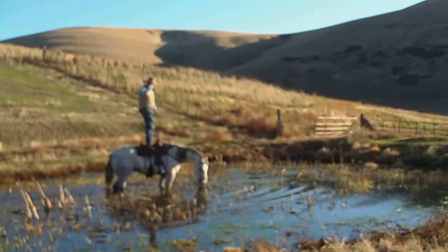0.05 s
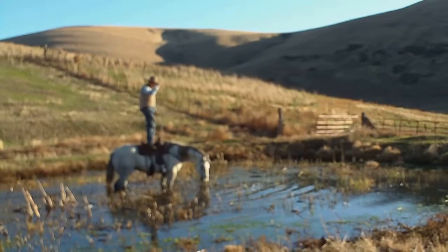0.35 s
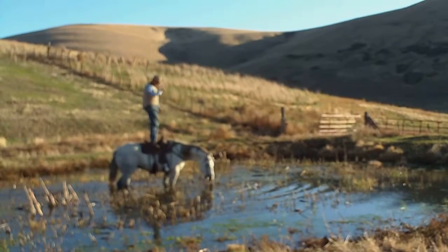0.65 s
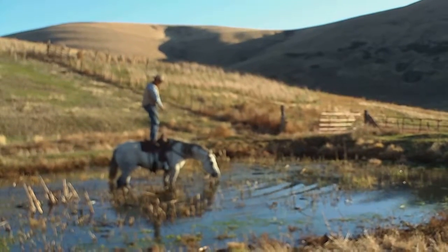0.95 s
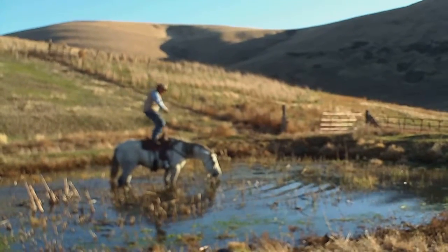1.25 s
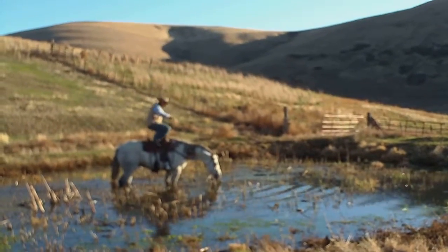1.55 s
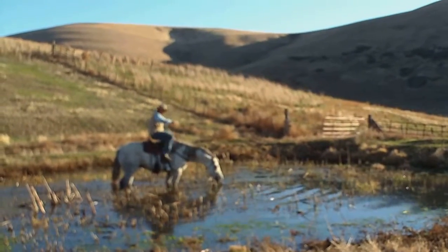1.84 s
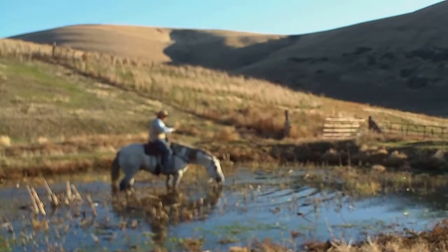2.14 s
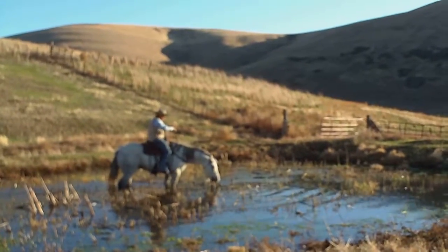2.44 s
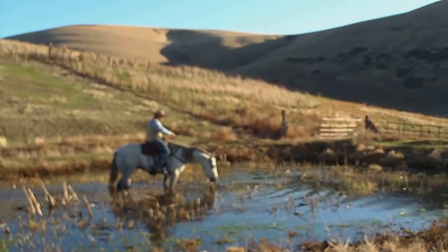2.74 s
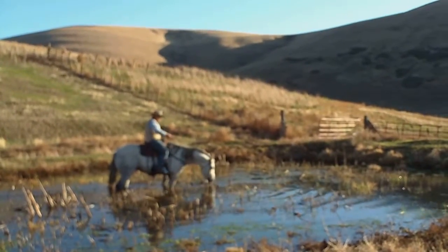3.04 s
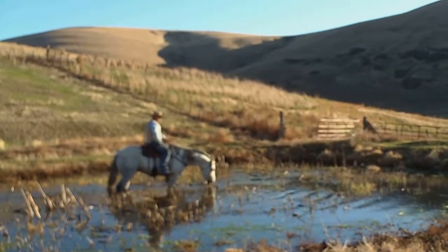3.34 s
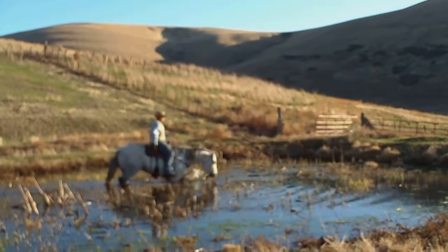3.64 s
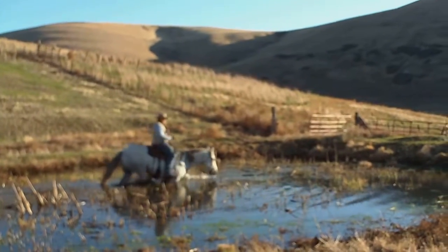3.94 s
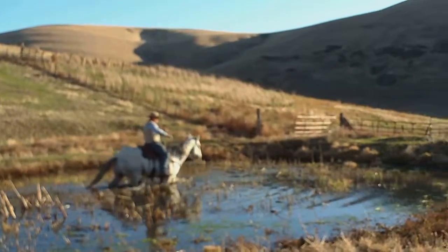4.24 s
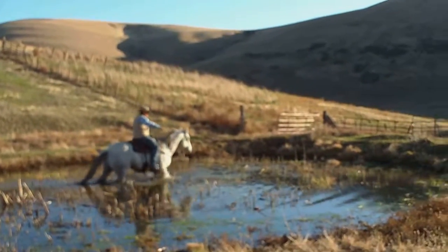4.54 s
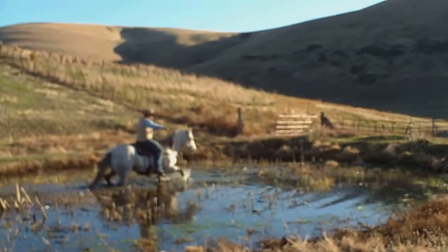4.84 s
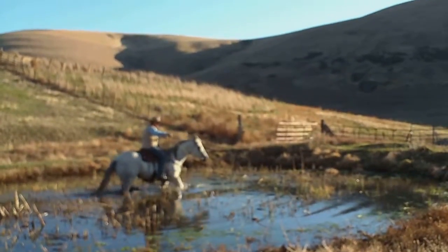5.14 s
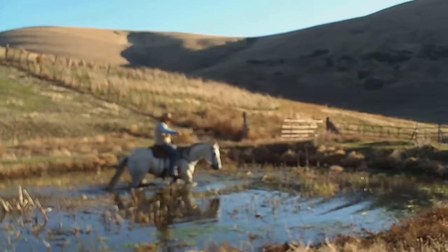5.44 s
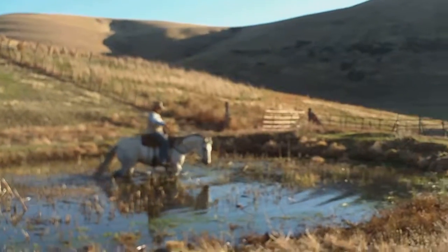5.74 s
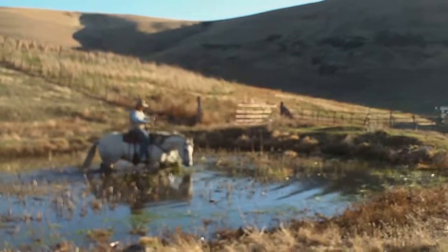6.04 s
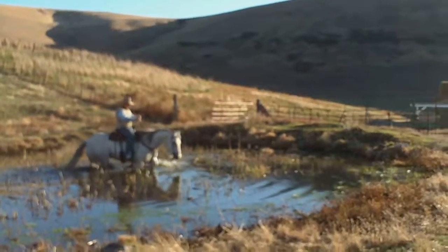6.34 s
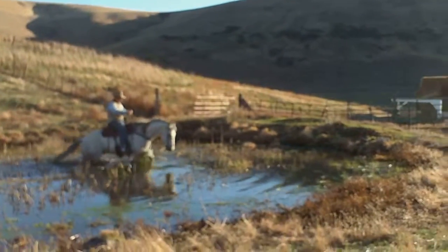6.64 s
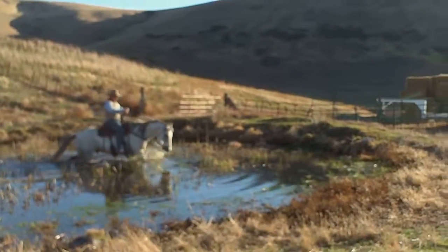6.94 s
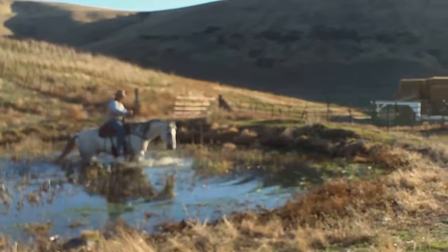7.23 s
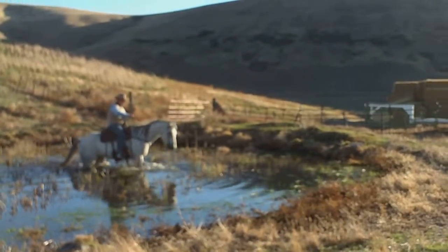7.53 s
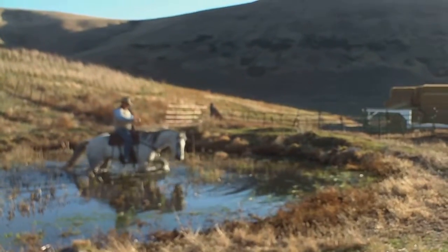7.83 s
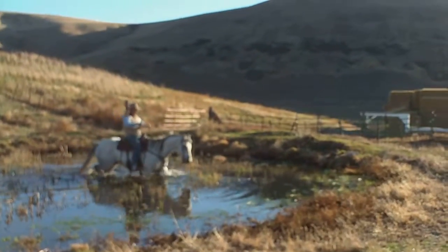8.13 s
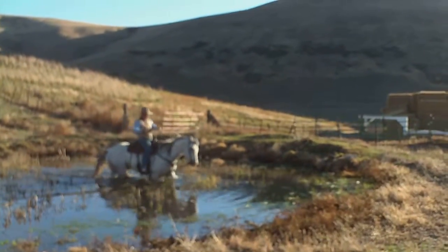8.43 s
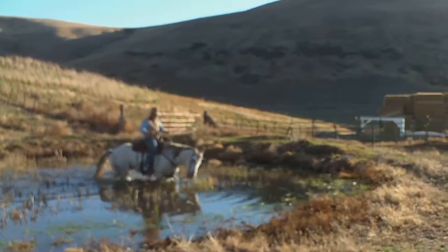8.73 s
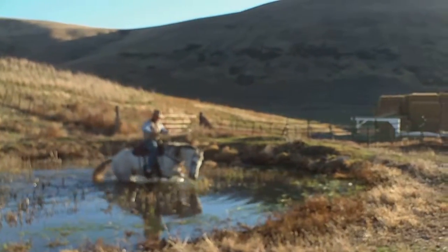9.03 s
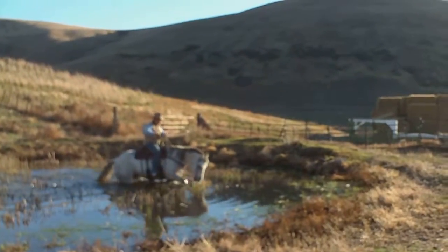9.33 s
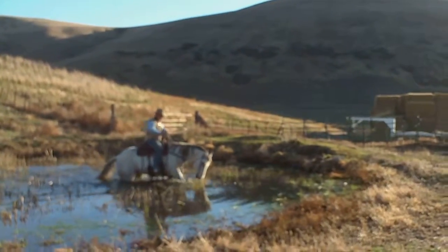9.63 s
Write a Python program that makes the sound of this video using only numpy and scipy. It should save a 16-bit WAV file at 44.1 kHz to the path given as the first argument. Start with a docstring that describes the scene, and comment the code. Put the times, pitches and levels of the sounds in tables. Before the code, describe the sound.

A steady hiss runs throughout this fairly quiet outdoor scene. For the first three seconds, gusts of wind rumble on the microphone with irregular low thumps, strongest between 1 and 2 seconds. A few faint drips fall into a pond in the first second, and another at about 3 seconds. Near 1.8 seconds saddle leather gives a very short squeak, jumping from low to high, and buckles click and clink just after 2 seconds.

At about 3.4 seconds a horse begins wading through the shallow water, with a cluster of sharp splashes around 3.8 to 4.1 seconds. Uneven strides follow roughly every half second, sloshing and bubbling, with hollow plops, low glugs and pattering spray. The splashing swells again from 6 to 7.3 seconds and from 8 to 8.6, then softens, with a last small splash near 9.7 seconds. The wind stays faint beneath the water.

```python
"""Wind buffets the microphone over a steady hiss, and a few drips fall where a horse stands in a pond.
The rider settles into the saddle: leather squeaks by stick-slip friction, and buckles click and ring.
Then the horse wades off. Its legs churn air into the water, each bubble ringing at its own resonance,
and its hooves plunge in, opening hollow cavities and throwing up spray."""
import sys
import numpy as np
from scipy import signal
from scipy.fft import rfft, irfft, next_fast_len
from scipy.io import wavfile

SR = 44100
rng = np.random.default_rng(int(sys.argv[2]) if len(sys.argv) > 2 else 0)


def wav_record(signal):
    """Record a signal, one row per channel, as 16-bit PCM in the file named by sys.argv[1]."""
    frames = np.transpose(np.atleast_2d(signal))
    bounded = np.clip(frames, -1, 1)
    # unit amplitude maps onto the largest positive 16-bit level
    quanta = np.round(bounded * 32767).astype(np.int16)
    wavfile.write(sys.argv[1], SR, quanta)


N = 431298
TIME = np.arange(N) / SR


def from_db(db):
    """Decibels to amplitude ratio."""
    return 10 ** (np.asarray(db) / 20)


def rms_one(x):
    """Normalisation to unit rms."""
    return x / np.sqrt(np.mean(x ** 2) + 1e-20)


def in_time(rows):
    """Linear interpolation of a table's columns at every sample."""
    times, *columns = np.transpose(rows)
    return [np.interp(TIME, times, column) for column in columns]


def at_hz(spectrum, hz):
    """Gain of a spectrum, interpolated in decibels over log frequency."""
    frequencies, db = np.transpose(spectrum)
    return from_db(np.interp(np.log(hz + 1e-3), np.log(frequencies), db))


def filtered(x, response):
    """Linear filtering: the spectrum is multiplied by a frequency response."""
    size = next_fast_len(N + SR // 10)
    return irfft(rfft(x, size) * response(np.fft.rfftfreq(size, 1 / SR)), size)[:N]


def noise(spectrum):
    """Spectral shaping of white noise; unit rms."""
    return rms_one(filtered(rng.standard_normal(N), lambda hz: at_hz(spectrum, hz)))


def drift(corner_hz):
    """Slow random fluctuation: low-passed noise of unit rms."""
    step, warm_up = 40, 2000
    pole = np.exp(-2 * np.pi * corner_hz * step / SR)
    white = rng.standard_normal(N // step + warm_up + 2)
    slow = signal.lfilter([1], [1, -2 * pole, pole * pole], white)[warm_up:]
    return np.interp(np.arange(N) / step, np.arange(len(slow)), rms_one(slow))


def uneven(fluctuation, depth_db):
    """Random amplitude modulation: a gain of unit rms."""
    return rms_one(from_db(depth_db * fluctuation))


def ring(impulses, hz, t60):
    """Damped resonator: a unit impulse starts a decaying sine of height 1."""
    r, w = np.exp(-np.log(1000) / (t60 * SR)), 2 * np.pi * hz / SR
    return signal.lfilter([0, np.sin(w)], [1, -2 * r * np.cos(w), r * r], impulses + 1e-18)


def bursts(times, gains, decays, rise_s):
    """Envelope of transients with exponential rise and decay, each peaking at its gain."""
    out = np.zeros(N)
    for onset, gain, decay in zip(times, gains, decays):
        start, decay = int(onset * SR), max(decay, 5e-4)
        age = TIME[:min(SR // 4, N - start)]
        shape = (1 - np.exp(-age / min(rise_s, decay))) * np.exp(-age / decay)
        out[start:start + len(age)] += gain * shape / shape.max()
    return out


def swells(starts, lengths, levels_db, rise_s, fall_s):
    """Envelope of incoherent events that build, hold and fade: overlaps add in power."""
    power = np.zeros(N)
    for start, length, db in zip(starts, lengths, levels_db):
        first = np.searchsorted(TIME, start)
        age = TIME[first:first + 2 * SR] - start
        shape = (1 - np.exp(-age / rise_s)) * np.exp(-np.maximum(age - length, 0) / fall_s)
        power[first:first + len(age)] += (from_db(db) * shape) ** 2
    return np.sqrt(power)


# background spectrum: (frequency [Hz], relative level [dB])
HISS_SPECTRUM = [(30, 8.5), (100, -9.5), (220, -0.5), (440, -3.5), (650, -1.5), (930, 4), (1250, 1),
                 (1450, 2), (2000, 2.5), (3200, 2.5), (5700, 3), (6400, 1.5), (6900, -0.5), (7400, -20.5)]
def hiss(level_db=-51):
    """Stationary broadband noise, heard as a steady hiss."""
    return from_db(level_db) * noise(HISS_SPECTRUM)


# eddy impacts: (time [s], pulse level [dB], width [s], flutter level [dB], flutter decay [s])
BUFFETS = [(0.024, -29.5, 0.0038, -42.5, 0.0052), (0.054, -33, 0.0043, -53, 0.0044),
           (0.129, -39, 0.0027, -55, 0.0028), (0.204, -40.5, 0.0024, -52, 0.0076),
           (0.418, -39, 0.009, -59, .008), (1.03, -42, 0.0089, -50.5, 0.0098),
           (1.316, -34, 0.0072, -45, 0.0091), (1.354, -35, 0.0014, -37.5, 0.0022),
           (1.361, -41, 0.0063, -50, 0.013), (1.413, -44, .003, -42, 0.0064), (1.426, -45, .002, -42, .004),
           (1.522, -32, 0.0049, -42, 0.0091), (1.533, -39, 0.0041, -41.5, 0.0082),
           (1.58, -38, 0.0051, -43.5, 0.014), (1.675, -39, .005, -45, 0.022),
           (1.699, -30, 0.0019, -48, 0.0034), (1.783, -41, .005, -43, 0.0055),
           (1.792, -27, .0035, -53, 0.0051), (1.812, -40, .005, -40, 0.0077), (1.9, -30, 0.0019, -39, .004),
           (1.945, -36, .0012, -43, 0.0031), (2.036, -36, 0.0035, -50, 0.0087),
           (2.251, -50, 0.0023, -45, 0.0028), (2.288, -44, .002, -48, 0.0055),
           (2.393, -37, 0.0079, -64, 0.0065), (2.894, -46, .003, -51.5, 0.0067),
           (2.919, -54, .002, -53, 0.0059), (2.978, -46, 0.0017, -48, .008),
           (2.996, -43, .002, -52, 0.0066), (3.018, -35.5, 0.0018, -49, 0.0044),
           (5.333, -41.5, 0.0032, -54, 0.011), (7.474, -40, 0.0028, -66, 0.0036)]
# turbulence around an impact: (frequency [Hz], relative level [dB])
FLUTTER_SPECTRUM = [(100, -8), (350, 4.5), (650, -1.5), (1000, -5.5), (1300, -18), (2500, -29)]
def buffets(edge_share=0.26, pulse_trim_db=-2.5):
    """An eddy at the microphone makes a bipolar pulse, pressure then suction, wrapped in turbulence."""
    out, turbulence = np.zeros(N), noise(FLUTTER_SPECTRUM)
    for time, pulse_db, width, flutter_db, flutter_s in BUFFETS:
        near = np.abs(TIME - time) < .06
        age = TIME[near] - time
        pulse = -np.tanh(age / (edge_share * width)) * np.exp(-np.abs(age) / width)
        flutter = np.exp(-np.abs(age) / flutter_s) * turbulence[near]
        out[near] += from_db(pulse_db + pulse_trim_db) * pulse / pulse.max()
        out[near] += from_db(flutter_db) * flutter
    return out


# gusts: (start [s], length [s], rumble level [dB], rush level [dB])
GUSTS = [(0.0, 0.15, -54, -66), (0.444, 0.36, -54, -51.5), (0.8, 0.21, -50, -50),
         (1.16, 0.76, -47.3, -52.5), (1.94, 0.58, -55.5, -57), (2.498, 0.13, -55, -57),
         (2.78, 0.2, -53, -59), (3.25, 0.14, -54.5, -65), (5.613, 0.11, -53, -63),
         (6.984, 0.46, -55.5, -62.5), (8.495, 0.076, -52.5, -73), (9.256, 0.046, -50.5, -65),
         (9.645, 0.073, -57, -57)]
# light breeze between gusts: (time [s], rumble level [dB])
BREEZE = [(0, -54.5), (3.0, -58), (4.0, -63.5), (4.35, -76), (4.7, -60), (5.1, -72), (6.1, -58.5),
          (6.7, -61.5), (7.7, -57.5), (8.6, -63), (9.1, -60), (9.7, -57)]
# the two bands of wind noise: (frequency [Hz], relative level [dB])
RUMBLE_SPECTRUM = [(12, -3), (30, -4.5), (60, -2.5), (100, -5.5), (160, -9), (300, -19.5), (800, -51)]
RUSH_SPECTRUM = [(70, -16.5), (150, 0.5), (280, 0), (450, -4), (700, -10), (1200, -26.5), (2500, -37.5)]
def wind(rise_s=0.0085, fall_s=0.056):
    """Turbulent pressure at the microphone rumbles; each gust strengthens it and adds a higher rush."""
    start, length, rumble_db, rush_db = np.transpose(GUSTS)
    breeze_db, = in_time(BREEZE)
    eddies = drift(20)
    pressure = np.hypot(from_db(breeze_db), swells(start, length, rumble_db, rise_s, fall_s))
    rumble = pressure * uneven(eddies, depth_db=3.0) * noise(RUMBLE_SPECTRUM)
    gusting = swells(start, length, rush_db, rise_s, fall_s)
    rush = gusting * uneven(eddies, depth_db=2.5) * noise(RUSH_SPECTRUM)
    return rumble + rush


# drips while the horse stands: (time [s], peak level [dB], pitch [Hz])
DRIPS = [(0.212, -49.5, 940), (0.481, -48.5, 1000), (0.571, -42.5, 1460), (0.765, -45, 975),
         (3.109, -46.5, 924)]
# a drop's impact on the surface: (frequency [Hz], relative level [dB])
PAT_SPECTRUM = [(300, -16), (1000, 5), (2200, -5), (5000, -21)]
def drips(ring_s=0.0047, pat_s=0.0062, pat_db=-5, climb_per_s=4.0):
    """Air entrainment: a drop pats the surface and traps one bubble, whose pitch climbs as it rises."""
    out, pat = np.zeros(N), noise(PAT_SPECTRUM)
    for onset, peak_db, hz in DRIPS:
        age = TIME - onset
        bubble = np.sin(2 * np.pi * hz * age * (1 + climb_per_s * age / 2))
        out += bursts([onset], [from_db(peak_db)], [ring_s], rise_s=0.002) * bubble
        out += bursts([onset], [from_db(peak_db + pat_db)], [pat_s], rise_s=0.0026) * pat
    return out


# course of the squeak: (time [s], pitch [Hz], drive level [dB], jitter [fraction of pitch])
SQUEAK_CURVE = [(1.82, 671, -49, .04), (1.83, 655, -47, 0.079), (1.847, 648, -45, 0.047),
                (1.85, 1570, -38, .03), (1.856, 1560, -38, .01), (1.861, 1580, -37.5, .01),
                (1.864, 1730, -42, .02), (1.872, 1760, -54, .03)]
# saddle resonances: (frequency [Hz], gain [dB])
SADDLE_RESPONSE = [(650, -9), (1000, 6), (1550, -15), (1750, 1.5), (2100, -12), (2600, -12), (3200, -9),
                   (4000, -10), (4750, -1.5), (5400, -9), (6500, -30)]
def leather_squeak(rasp=0.33):
    """Stick-slip friction: loaded leather creaks low, then high; the saddle shapes its harmonics."""
    pitch, level_db, jitter = in_time(SQUEAK_CURVE)
    phase = 2 * np.pi * np.cumsum(pitch * (1 + jitter * drift(500))) / SR
    grip = 1 + rasp * drift(400)
    on = (TIME > SQUEAK_CURVE[0][0]) & (TIME < SQUEAK_CURVE[-1][0])
    out = np.zeros(N)
    out[on] = sum(at_hz(SADDLE_RESPONSE, k * pitch[on]) * np.sin(k * phase[on]) for k in range(1, 10))
    return out * grip * from_db(level_db)


# buckle impacts: (time [s], level [dB], contact decay [s], relative knock level [dB])
BUCKLE_CLICKS = [(2.034, -35.5, 0.0012, -9), (2.096, -40, .0033, -21), (2.1309, -29, 0.005, -2.5),
                 (2.148, -48, .002, 6)]
# contact noise: (frequency [Hz], relative level [dB])
SNAP_SPECTRUM = [(300, -13), (800, -4), (2000, 4), (3200, -5.5), (4700, 7.5), (6300, -3), (7200, -8),
                 (9000, -6)]
# modes of the saddle gear: (frequency [Hz], gain [dB], t60 [s])
GEAR_MODES = [(740, -11, 0.031), (970, 0.5, .03), (1110, -2, 0.04), (1460, -11, 0.055), (1860, -12, 0.047),
              (2060, -21, .035), (4800, -24, .02), (5260, -14, 0.018), (5510, -16, 0.013),
              (7150, -0.5, 0.0091)]
def buckles(low_cut_hz=760, rustle_s=0.017, rustle_db=-20, seat_s=0.0022, snap_db=-5.0):
    """Impact excitation: a buckle snaps and, as it seats, rings the gear's modes; the straps rustle."""
    times, level_db, contact_s, knock_db = np.transpose(BUCKLE_CLICKS)
    contact = bursts(times, from_db(level_db), contact_s, rise_s=0.00091)
    rustle = bursts(times, from_db(level_db + rustle_db), [rustle_s] * len(times), rise_s=0.0061)
    snap = from_db(snap_db) * (contact + rustle) * noise(SNAP_SPECTRUM)
    knocks = np.zeros(N)
    knocks[((times + seat_s) * SR).astype(int)] = from_db(level_db + knock_db)
    ringing = sum(from_db(db) * ring(knocks, hz, t60) for hz, db, t60 in GEAR_MODES)
    return signal.sosfilt(signal.butter(2, low_cut_hz, "high", fs=SR, output="sos"), snap + ringing)


# air pockets dragged under by a leg: (time [s], level [dB], pitch [Hz], glide [octaves/s])
GLUGS = [(3.494, -52, 348, 3), (3.689, -52, 193, 4), (4.039, -50, 149.4, 2.5), (4.122, -49, 161, 4),
         (6.037, -45, 237, 1), (6.195, -45.5, 261.6, -7.5), (6.525, -46.5, 171, 19),
         (6.848, -45.5, 215, 3.5), (7.298, -47.5, 229, 3.5), (8.004, -51.5, 233, -1),
         (8.549, -50.5, 127, 3.5), (9.29, -52, 146, 7)]
def glugs(decay_s=0.025, rise_s=0.02, waver=0.2, throb=0.35):
    """A large air pocket resonates low; as it deforms and breaks up, its note wavers, throbs and glides."""
    out, wobble = np.zeros(N), drift(90)
    breakup = rms_one(1 + throb * drift(70))
    for onset, level_db, hz, glide in GLUGS:
        near = (TIME > onset) & (TIME < onset + .2)
        pitch = hz * 2 ** (glide * (TIME[near] - onset)) * (1 + waver * wobble[near])
        envelope = bursts([onset], [from_db(level_db)], [decay_s], rise_s) * breakup
        out[near] += envelope[near] * np.sin(2 * np.pi * np.cumsum(pitch) / SR)
    return out


def rising_bubbles(times, gains, pitches, decay_cycles, rise_s=0.0014, climb=0.045):
    """Each bubble is a damped oscillator whose pitch climbs as it nears the surface."""
    out, age = np.zeros(N), TIME[:SR // 12]
    for onset, gain, hz, decay_s in zip(times, gains, pitches, decay_cycles / pitches):
        start = int(onset * SR)
        shape = (1 - np.exp(-age / rise_s)) * np.exp(-age / decay_s)
        phase = 2 * np.pi * hz * age * (1 + climb * age / decay_s / 2)
        note = gain * shape / shape.max() * np.sin(phase)
        out[start:start + len(age)] += note[:N - start]
    return out


# large bubbles in the wake: (time [s], peak level [dB], pitch [Hz], decay to 1/e [cycles])
PLOPS = [(3.452, -48.5, 990, 7), (3.514, -47, 1020, 12), (3.655, -49, 727, 9), (3.676, -41, 630, 7.9),
         (3.765, -44, 1030, 9), (4.079, -37, 865, 3.3), (4.157, -42, 690, 9.8), (4.177, -45, 1194, 15),
         (4.247, -46, 775, 11), (4.273, -47, 827, 12), (4.413, -47, 854, 5.8), (4.472, -46.5, 1010, 7),
         (4.803, -47, 954, 9), (4.866, -43, 846, 9.5), (5.082, -49, 934, 7.5), (5.31, -47, 1144, 9.8),
         (5.38, -45, 840, 7), (5.509, -46.5, 830, 7.9), (5.529, -48, 856, 7), (5.614, -51, 905, 12),
         (5.732, -41.5, 834, 6), (5.788, -47, 902, 15), (5.817, -44, 880, 8.5), (5.862, -48, 666, 7.3),
         (5.942, -46.5, 1020, 9), (5.961, -41, 850, 6), (6.04, -45, 764, 12), (6.198, -40, 620, 7.5),
         (6.222, -46, 806, 9.8), (6.32, -46, 730, 10), (6.36, -45, 740, 13), (6.39, -45, 766, 12),
         (6.436, -46.5, 870, 13), (6.545, -40.5, 653, 9.9), (6.667, -47, 910, 5.1), (6.827, -42, 868, 11),
         (7.129, -39.5, 764, 8.3), (7.376, -47, 854, 7.8), (8.019, -51, 920, 9.1), (8.145, -47, 885, 7.5),
         (8.212, -43, 757, 12), (8.299, -41, 680, 9), (8.318, -44, 850, 8.6), (8.43, -42, 853, 8.6),
         (8.461, -39.5, 693, 9), (8.61, -39.5, 700, 6.3), (8.694, -43, 890, 9), (8.814, -47, 1020, 6.5),
         (8.857, -37, 652, 5.2), (8.961, -49, 833, 14), (9.071, -51, 895, 7), (9.111, -46.5, 970, 7.3),
         (9.158, -46, 960, 10), (9.3, -42, 740, 9), (9.369, -46, 800, 12), (9.49, -51, 836, 7)]
def plops():
    """Free oscillation of single large bubbles, which stand out of the slosh one by one."""
    times, peak_db, hz, cycles = np.transpose(PLOPS)
    return rising_bubbles(times, from_db(peak_db), hz, cycles)


# bubbles of gurgles, splashes and slosh: (pitch [Hz], relative level [dB])
BUBBLE_SPECTRUM = [(480, -18.5), (600, 1.5), (750, 2), (890, 1.5), (1050, -5), (1180, -1), (1290, -15),
                   (1400, -1)]
def gurgles(per_s=65, spread_db=5.0):
    """A sparse random process of rising bubbles, uniform in log pitch; unit rms."""
    born = rng.random(N) < per_s / SR
    lowest, highest = BUBBLE_SPECTRUM[0][0], BUBBLE_SPECTRUM[-1][0]
    hz = lowest * (highest / lowest) ** rng.random(N)[born]
    gains = at_hz(BUBBLE_SPECTRUM, hz) * from_db(spread_db * rng.uniform(-1, 1, N)[born])
    return rms_one(rising_bubbles(TIME[born], gains, hz, decay_cycles=10))


def bubble_cloud(spectrum, per_s, t60_cycles, skew_db, sizes):
    """Superposition of randomly excited bubbles, one resonance for each size; unit rms."""
    born = np.flatnonzero(rng.random(N) < per_s / SR)
    strength = from_db(skew_db * np.minimum(rng.exponential(1, N), 4)) * rng.choice([-1, 1], N)
    size_of = rng.integers(0, sizes, N)[born]
    out = np.zeros(N)
    for size, hz in enumerate(np.geomspace(spectrum[0][0], spectrum[-1][0], sizes)):
        impulses, onsets = np.zeros(N), born[size_of == size]
        impulses[onsets] = strength[onsets]
        out += at_hz(spectrum, hz) * rms_one(ring(impulses, hz, t60_cycles / hz))
    # little is radiated below the pitch of the largest bubble
    low_cut = signal.butter(2, 0.42 * spectrum[0][0], "high", fs=SR, output="sos")
    return rms_one(signal.sosfilt(low_cut, out))


# impacts of hooves and thrown water: (time [s], bubble level [dB], coarse spray level [dB],
# fine spray level [dB], decay [s], cavity level [dB], cavity pitch [Hz])
SPLASHES = [(3.648, -50, -50, -40.5, .0026, -48, 766), (3.688, -45, -56, -62, 0.033, -41, 1080),
            (3.828, -48, -50, -51, 0.0027, -37, 950), (3.837, -48, -47, -45.5, 0.011, -42, 980),
            (3.851, -44, -49, -46, .005, -41, 900), (3.8575, -38.5, -51, -56, 0.0047, -29, 827),
            (3.8627, -41, -45, -51, 0.0078, -29, 1070), (3.8667, -45, -46, -48, 0.004, -30.5, 950),
            (3.932, -43, -47, -49, .008, -36, 930), (4.042, -41, -44.5, -44.5, 0.016, -50, 860),
            (4.591, -46, -51, -63, 0.038, -50, 940), (4.772, -44.5, -64, -68, 0.0094, -47, 950),
            (4.803, -51, -64, -70, 0.057, -42, 970), (5.783, -48.5, -65, -64, 0.029, -47, 890),
            (6.056, -49, -67, -60, .0082, -33.5, 810), (6.111, -50, -60, -62, .0042, -42, 830),
            (6.174, -45.5, -57, -54, 0.084, -41, 780), (6.386, -46, -49, -52, 0.0099, -44, 850),
            (6.633, -49, -48, -60, .006, -41, 970), (6.649, -48, -48, -54, .046, -45, 915),
            (6.81, -47, -64, -62, 0.018, -40, 770), (7.028, -37.5, -47, -49, 0.025, -33, 860),
            (7.038, -50, -47, -60, 0.016, -40, 970), (7.23, -59, -50, -48.5, .017, -53.5, 900),
            (7.25, -50, -53, -54, 0.006, -41, 960), (7.272, -61.5, -40, -58, .0016, -58.5, 1100),
            (7.556, -66, -41, -52, 0.0032, -65, 1110), (7.636, -44, -51, -53, 0.016, -37, 870),
            (7.917, -42.5, -59, -58, 0.0082, -43, 844), (7.942, -51, -55, -57, 0.01, -38, 835),
            (8.103, -47, -53, -59, .015, -35, 553), (8.12, -54, -47.5, -53, 0.017, -46, 730),
            (8.191, -52, -56, -61, .0078, -39, 680), (8.389, -46.5, -55, -57, .0041, -40, 880),
            (8.485, -50, -46, -44, 0.029, -46, 910), (9.282, -56, -65, -54, 0.021, -47, 890),
            (9.439, -52, -56, -60, .003, -45, 930), (9.722, -48, -37, -43, 0.0017, -47, 1150),
            (9.742, -70, -49, -48, .0016, -64, 1100)]
# coarse and fine drops thrown by a plunge: (pitch [Hz], relative level [dB])
COARSE_SPRAY = [(1250, -2.5), (1450, 7), (1800, 10), (2300, 9.5), (2700, -9), (3800, -7.5)]
FINE_SPRAY = [(3000, -8.5), (3900, -6.5), (4800, 8.5), (5700, 12), (6500, -8)]
def splashes(cavity_life_s=0.0063, cavity_open_s=0.0012, band_hz=(440, 6600)):
    """Cavity resonance: a plunge opens a hollow that rings until pinch-off, amid bubbles and spray."""
    times, puff_db, coarse_db, fine_db, decays, cavity_db, cavity_hz = np.transpose(SPLASHES)
    cavities = np.zeros(N)
    for start, gain, hz, decay in zip((times * SR).astype(int), from_db(cavity_db), cavity_hz, decays):
        age = TIME[:min(SR // 10, N - start)]
        pinch = np.exp(-(age / min(cavity_life_s, decay)) ** 3)
        shape = (1 - np.exp(-age / cavity_open_s)) * pinch
        cavities[start:start + len(age)] += gain * shape / shape.max() * np.sin(2 * np.pi * hz * age)
    puffs = bursts(times, from_db(puff_db), decays, rise_s=0.0045)
    puffs *= bubble_cloud(BUBBLE_SPECTRUM, per_s=8100, t60_cycles=8, skew_db=4.0, sizes=14)
    slaps = bursts(times, from_db(coarse_db), decays, rise_s=0.00037)
    slaps *= bubble_cloud(COARSE_SPRAY, per_s=3800, t60_cycles=9.2, skew_db=-3.2, sizes=14)
    spits = bursts(times, from_db(fine_db), decays, rise_s=0.0092)
    spits *= bubble_cloud(FINE_SPRAY, per_s=9000, t60_cycles=18, skew_db=-3.5, sizes=14)
    band = signal.butter(2, band_hz, "band", fs=SR, output="sos")
    return signal.sosfilt(band, cavities + puffs + slaps + spits)


# leg sweeps: (start [s], length [s], bubbling level [dB], spray level [dB], churning level [dB])
STRIDES = [(3.418, 0.14, -52.5, -61, -62), (3.621, 0.093, -46, -52.5, -55), (3.81, 0.29, -45, -49, -54),
           (4.226, 0.5, -53.5, -53.5, -68), (4.72, 0.38, -52, -54, -65), (5.157, 0.39, -54, -55.5, -67),
           (5.713, 0.33, -53, -59.5, -70), (6.015, 0.34, -50.5, -54, -57.5), (6.39, 0.49, -49, -51.5, -60),
           (6.865, 0.41, -47, -50, -52.5), (7.393, 0.41, -57, -63.5, -57.5),
           (7.87, 0.26, -51.5, -57, -57.5), (8.122, 0.37, -49, -52.5, -61.5),
           (8.548, 0.15, -50, -58.5, -56), (8.832, 0.43, -54, -58.5, -62), (9.13, 0.26, -57, -54, -61),
           (9.23, 0.14, -52, -53.5, -64), (9.61, 0.12, -61, -59, -54)]
# falling droplets and submerged air pockets: (pitch [Hz], relative level [dB])
DROPLET_SPECTRUM = [(1700, 9), (1900, -4), (2350, 2), (2650, -7.5), (3150, -3.5), (3550, -16), (3950, 6),
                    (4280, -12), (4650, 5), (5700, 1), (6100, -11), (6800, -15.5)]
POCKET_SPECTRUM = [(120, -6.5), (180, -4.5), (270, 4), (400, 4)]
def wading(push_s=0.029, spray_flight_s=0.018, gurgle_power_share=0.18):
    """Air entrainment by each stride: bubbles slosh, larger pockets churn lower, and spray lands later."""
    start, length, bubbling_db, spray_db, churn_db = np.transpose(STRIDES)
    surge = drift(10.0)   # small waves break unevenly and drive all layers together
    bubbling = swells(start, length, bubbling_db, push_s, fall_s=0.18) * uneven(surge, depth_db=1.05)
    landing = start + spray_flight_s
    spraying = swells(landing, length, spray_db, push_s, fall_s=0.18) * uneven(surge, depth_db=1.46)
    churning = swells(start, length, churn_db, push_s, fall_s=0.065) * uneven(surge, depth_db=3.1)
    droplets = bubble_cloud(DROPLET_SPECTRUM, per_s=5000, t60_cycles=34, skew_db=1.8, sizes=44)
    slosh = bubble_cloud(BUBBLE_SPECTRUM, per_s=1300, t60_cycles=21, skew_db=1.0, sizes=28)
    bubbles = np.sqrt(1 - gurgle_power_share) * slosh + np.sqrt(gurgle_power_share) * gurgles()
    pockets = bubble_cloud(POCKET_SPECTRUM, per_s=300, t60_cycles=9.3, skew_db=2.0, sizes=10)
    return bubbling * bubbles + spraying * droplets + churning * pockets


def pond_reflection(x, lag_s=0.00093, mirror=0.38, dull_hz=3200):
    """Comb filtering: the direct sound interferes with its delayed, duller reflection off the surface."""
    return filtered(x, lambda hz: 1 + mirror * np.exp(-(hz / dull_hz) ** 2 - 2j * np.pi * hz * lag_s))


def scene():
    """Superposition of water, hiss, saddle and wind, alike in both channels."""
    water = pond_reflection(wading() + splashes() + plops() + glugs())
    mono = water + hiss() + drips() + buckles() + leather_squeak() + wind() + buffets()
    return np.array([mono, mono])


def record(dry, cutoff_hz=7350):
    """Band limiting: an elliptic low-pass cuts the treble steeply."""
    return signal.sosfilt(signal.ellip(12, .1, 80, cutoff_hz, fs=SR, output="sos"), dry)


dry = scene()
out = record(dry)
wav_record(out)
```